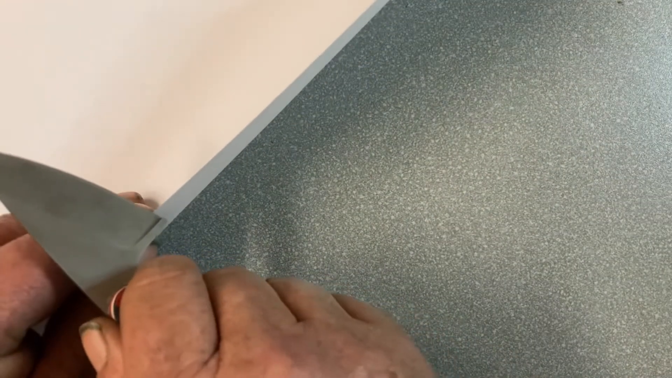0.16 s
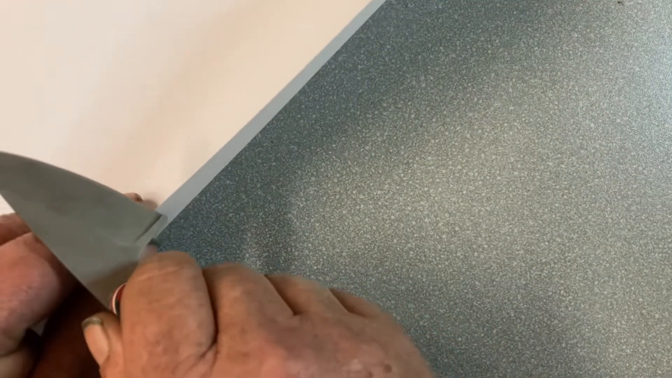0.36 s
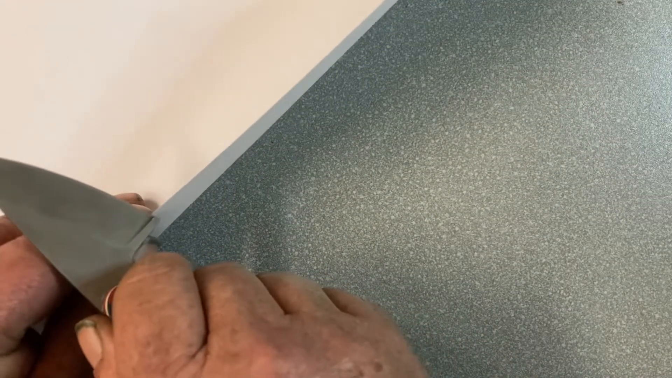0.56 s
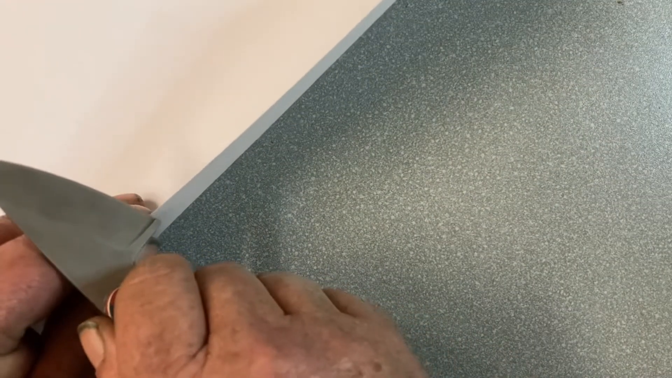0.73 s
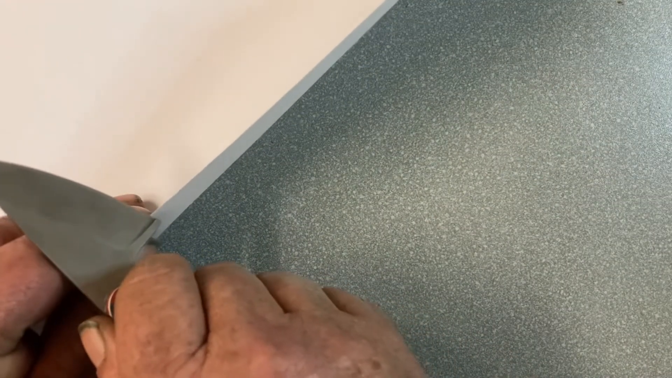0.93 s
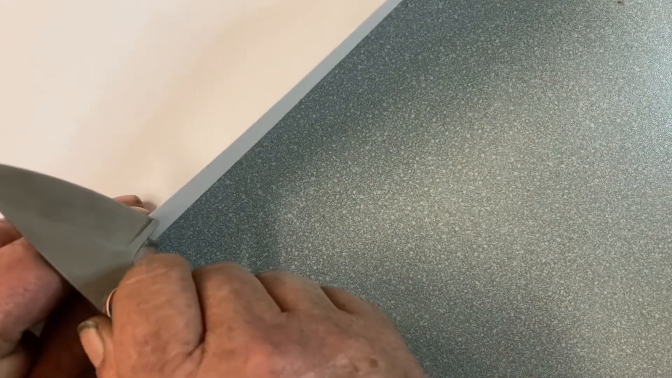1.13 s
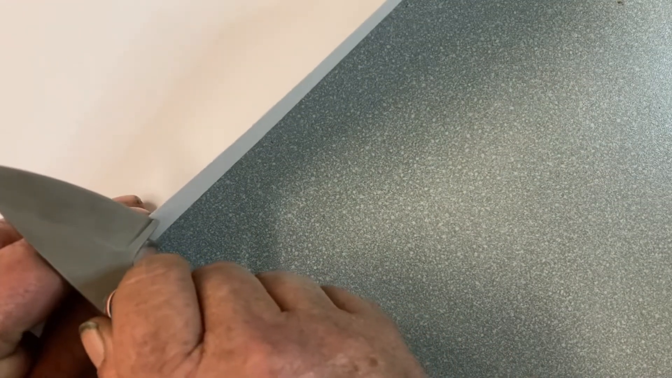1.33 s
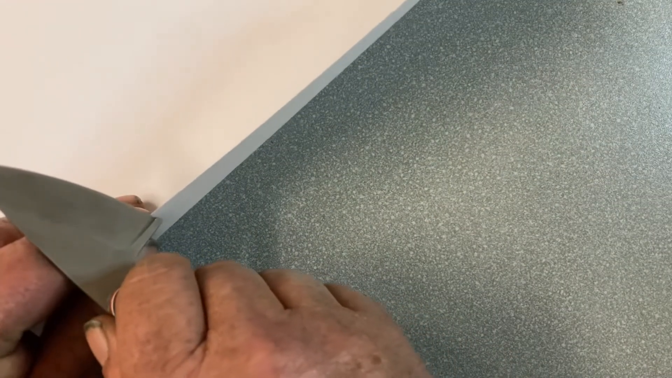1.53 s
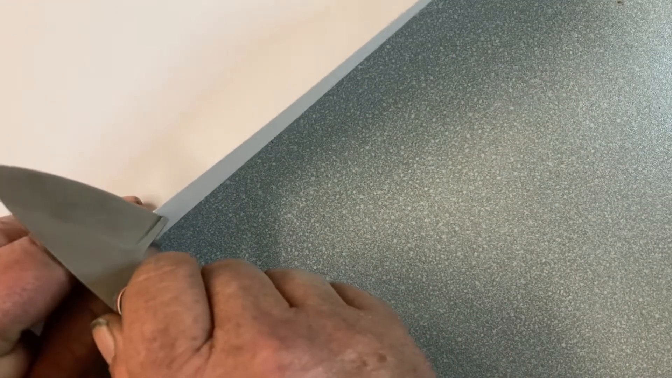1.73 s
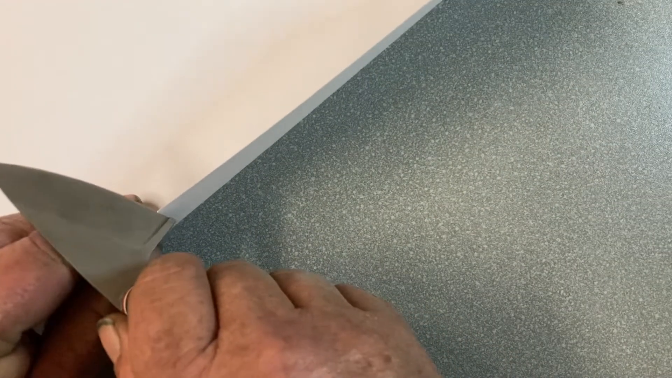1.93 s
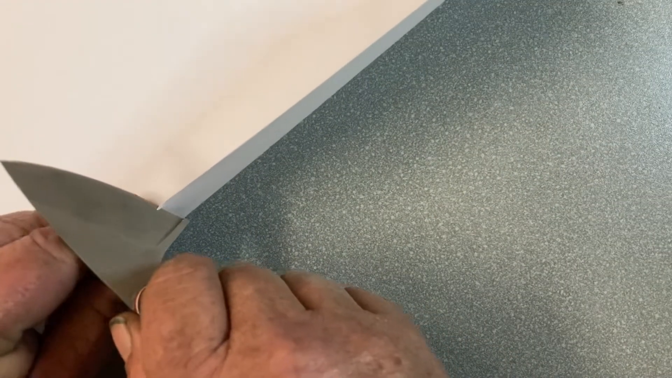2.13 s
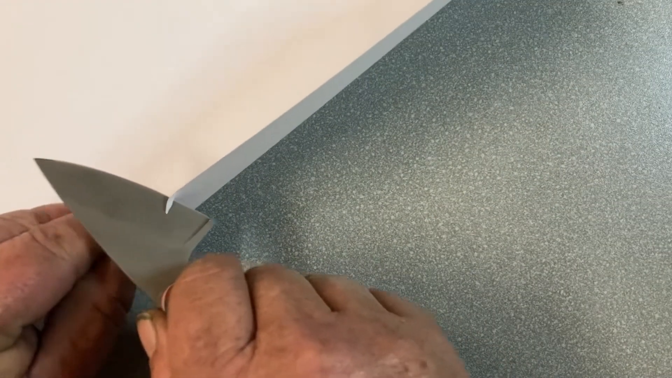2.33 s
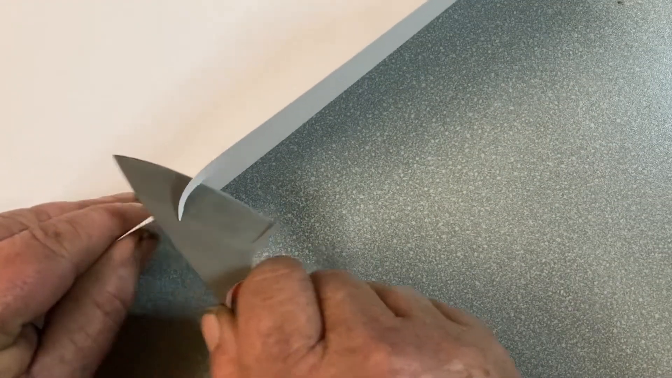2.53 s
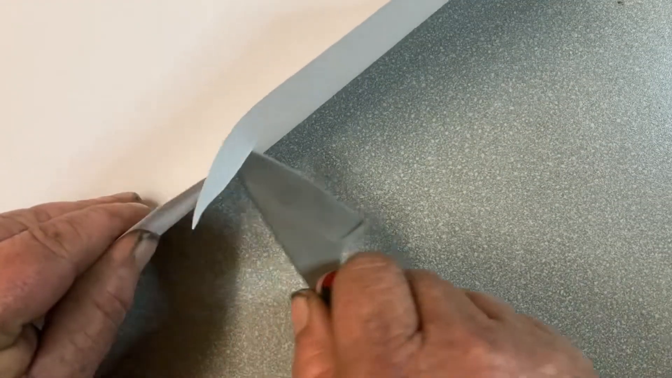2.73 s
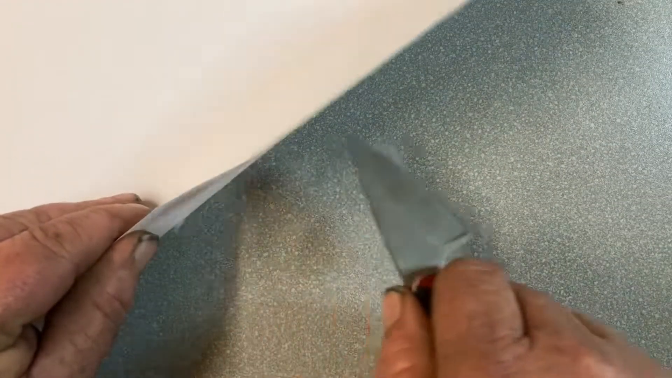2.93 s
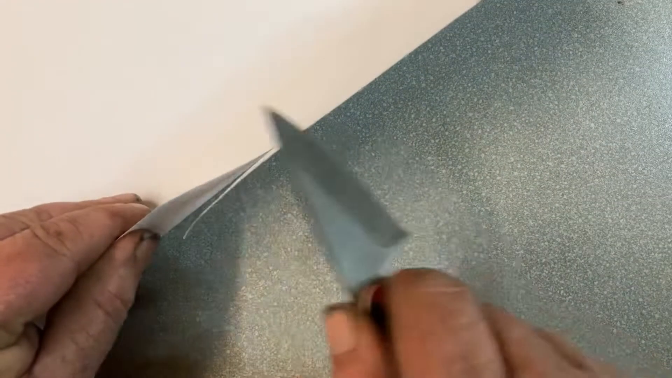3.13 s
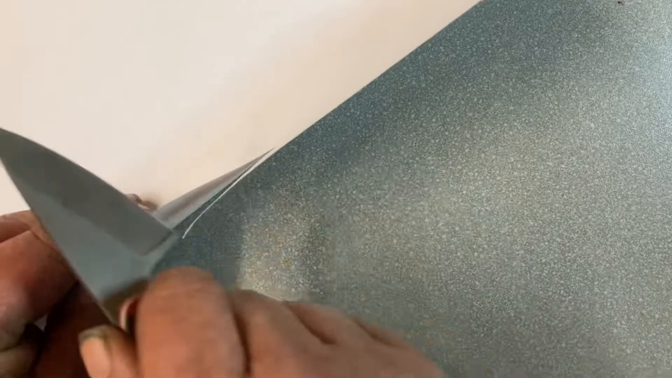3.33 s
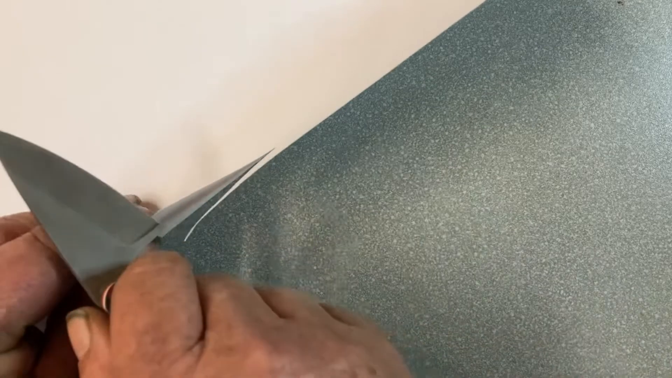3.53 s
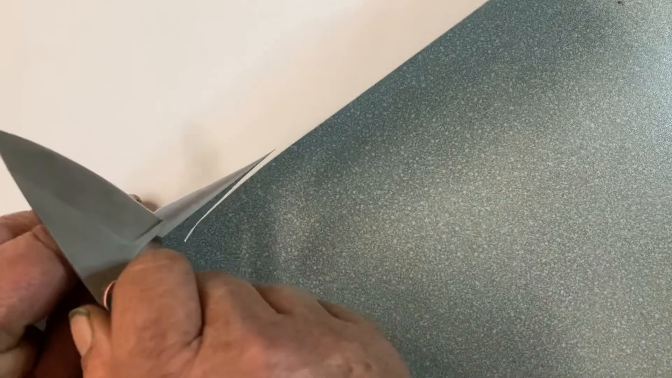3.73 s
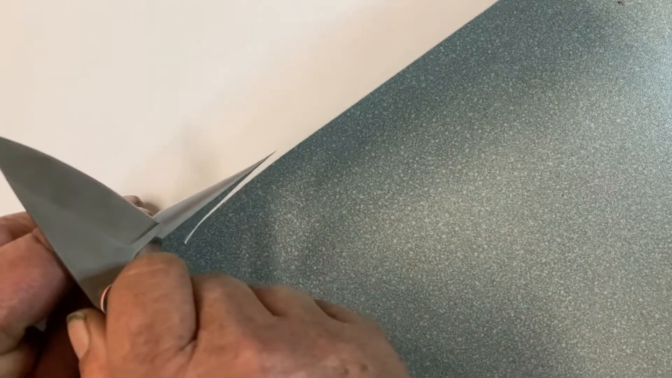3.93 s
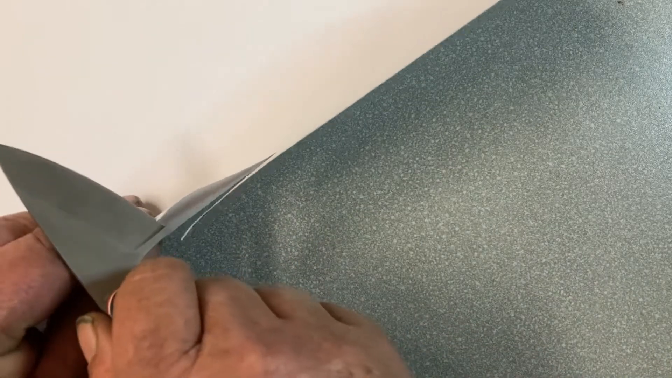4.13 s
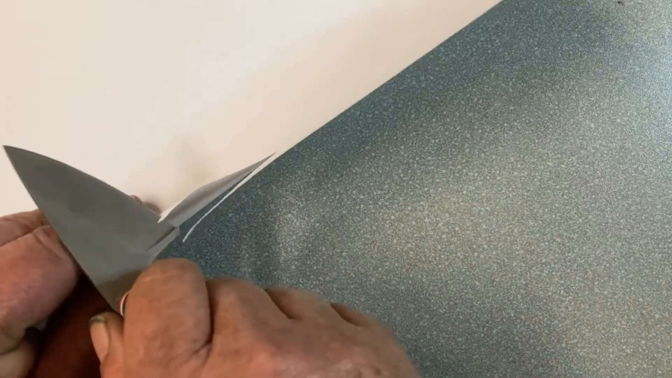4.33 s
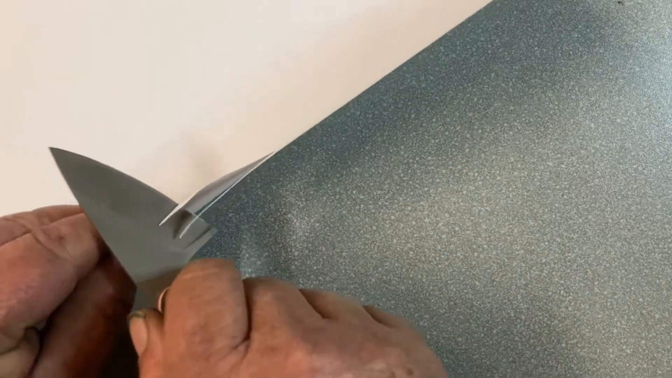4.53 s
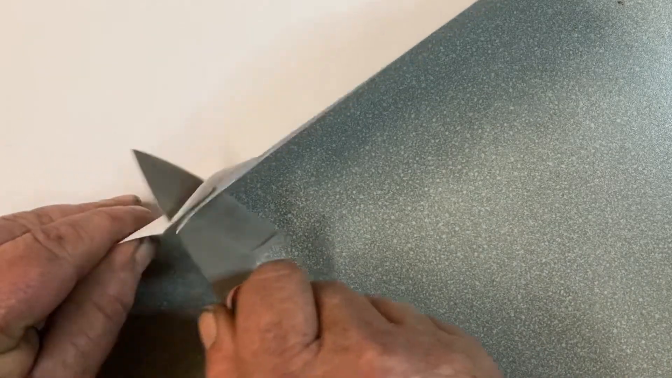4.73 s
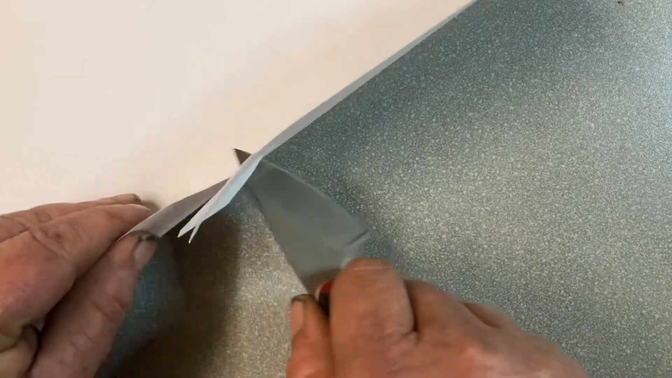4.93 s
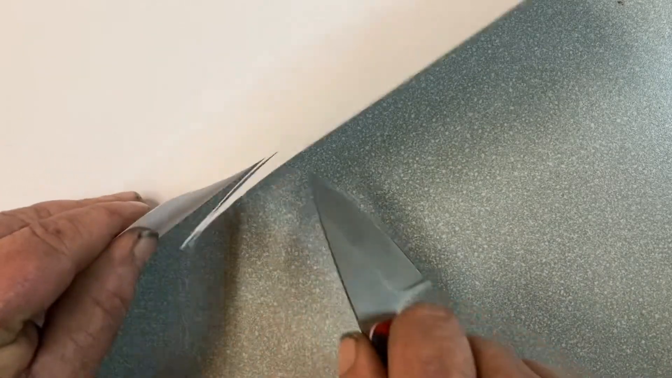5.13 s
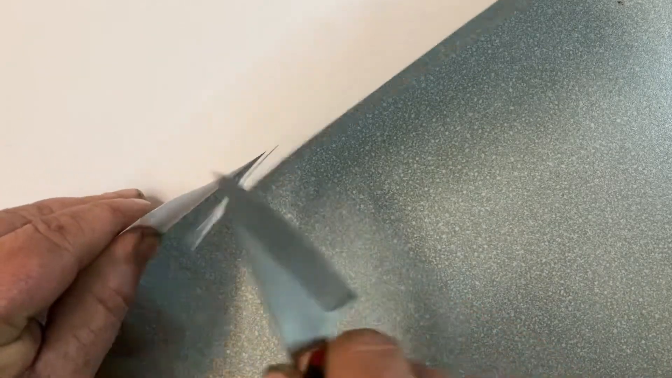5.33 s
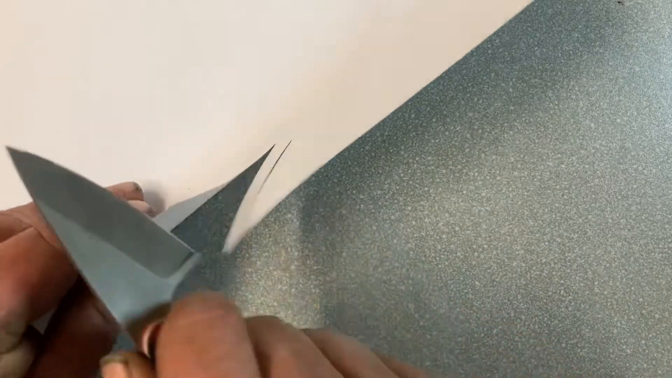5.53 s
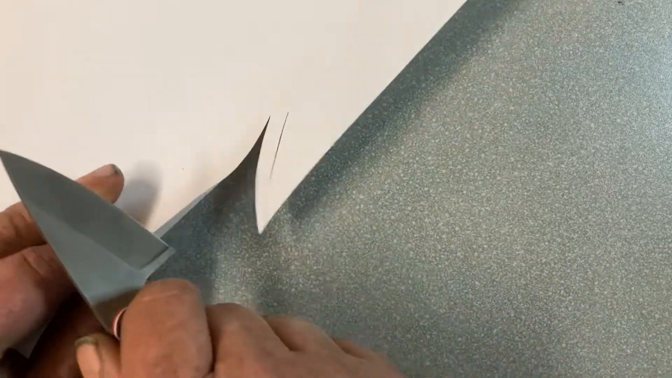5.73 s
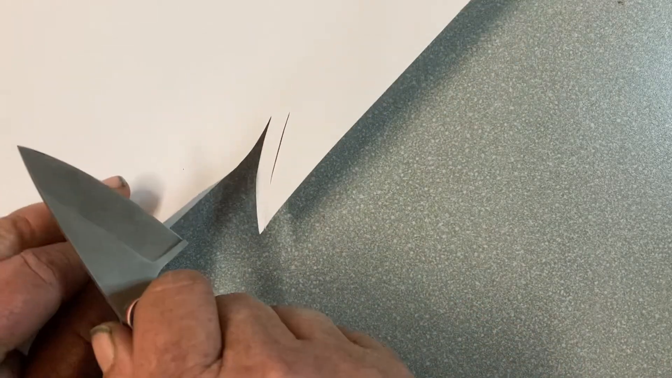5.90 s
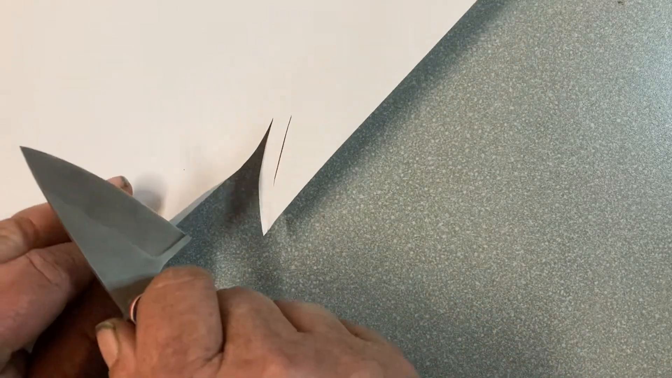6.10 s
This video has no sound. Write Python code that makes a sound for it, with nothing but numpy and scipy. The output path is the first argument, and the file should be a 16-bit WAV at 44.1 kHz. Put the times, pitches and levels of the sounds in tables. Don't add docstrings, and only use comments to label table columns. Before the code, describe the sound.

Close stereo microphones in a small room catch a small knife working on a hand-held sheet of paper. Faint dry scuffs and a small snap lead into a slice that swells to a bright rip and crack. After a quiet gap, the steel edge ticks and stutters, then a second, steadier tearing hiss follows. The sheet pops and rustles as it is turned, over a low motor hum and faint throbbing fan.

```python
import sys
import numpy as np
from scipy import signal
from scipy.io import wavfile
from scipy.ndimage import uniform_filter1d

SR = 44100
rng = np.random.default_rng(int(sys.argv[2]) if len(sys.argv) > 2 else 0)


def put_to_file(sound):
    columns = np.atleast_2d(sound).T
    safe = np.clip(columns, -1, 1)
    whole_steps = np.round(safe * 32767)
    wavfile.write(sys.argv[1], SR, whole_steps.astype(np.int16))


def voltage_ratio(decibels):
    exponent = np.asarray(decibels, float) / 20
    return 10 ** exponent


N = 271656

# hz, level_db
BLADE_COLOUR = [(400, -20), (1000, -8), (2000, -10), (3100, -5), (4500, -10), (6300, -9), (8200, 0),
                (10000, -9), (11800, -7), (13500, -13), (15500, -16)]


def evened(x):
    return x / np.sqrt(np.mean(x ** 2) + 1e-20)


def read(points, hz):
    f, value = np.transpose(points)
    return np.interp(np.log(hz + 1), np.log(f + 1), value)


def band(x, lo_hz, hi_hz):
    return signal.sosfilt(signal.butter(3, [lo_hz, hi_hz], "band", fs=SR, output="sos"), x)


def slow_noise(count, smooth):
    once = uniform_filter1d(rng.standard_normal(count), smooth)
    return evened(uniform_filter1d(once, smooth))


def patches(shape, bins, frames):
    field = rng.standard_normal(shape)
    return evened(uniform_filter1d(uniform_filter1d(field, bins, 0), frames, 1))


def shaped(x, points, patchy_db, bins, frames, size):
    hz, _, z = signal.stft(x, SR, nperseg=size, noverlap=size * 3 // 4)
    colour_db = read(points, hz)[:, None]
    z = z * voltage_ratio(colour_db + patchy_db * patches(z.shape[1:], bins, frames))
    return signal.istft(z, SR, nperseg=size, noverlap=size * 3 // 4)[1][:, :x.shape[1]]


def halves(x):
    body, hiss = band(x, 300, 3600), band(x, 3600, 19000)
    return body / band(x, 1000, 3000).std(), hiss / band(x, 6500, 10500).std()


def friction(tables, colour, grain_db, modes_db, flutter_db, body_db, hiss_db):
    count = N // 2 + N // 8
    first = min(round(tables[0][0][0] * SR) - 2000, N - count)
    t = (first + np.arange(count)) / SR
    sizes = voltage_ratio(grain_db * np.minimum(rng.exponential(1, count), 4))
    slip = evened(voltage_ratio(flutter_db * slow_noise(count, 180)))
    clicks = rng.standard_normal((2, count)) * sizes
    body, hiss = halves(shaped(clicks, colour, modes_db, bins=2, frames=30, size=512))
    out = np.zeros((2, N))
    for rows in tables:
        s, level_db, share_db = np.transpose(rows)
        on = np.flatnonzero((t >= s[0]) & (t < s[-1]))
        edge = np.minimum(1, np.minimum(t[on] - s[0], s[-1] - t[on]) / 0.0051)
        body_gain = voltage_ratio(body_db + np.interp(t[on], s, share_db))
        mix = voltage_ratio(hiss_db) * hiss[:, on] + body_gain * body[:, on]
        out[:, first + on] += edge * slip[on] * voltage_ratio(np.interp(t[on], s, level_db)) * mix
    return out


def pushed(curve, body_db, follow):
    s, db = np.transpose(curve)
    ref_db = -40
    return [np.transpose([s, db, body_db + (follow - 1) * (db - ref_db)])]


def strokes(rows, release_s, linger):
    level = np.array([-14.5, 0, 0, -39.5])
    body_follow = 0.59
    curves = []
    for s, rise, hold, db, body_db in rows:
        times = s + np.cumsum([0, rise, hold, release_s + linger * (rise + hold)])
        share_db = body_db + (body_follow - 1) * np.minimum(level, 0) / 2
        curves.append(np.transpose([times, db + level, share_db]))
    return curves


def slices():
    # time_s, level_db
    push_1 = [
        (1.95, -70),
        (2.052, -51.5),
        (2.3, -46),
        (2.49, -38.5),
        (2.706, -35),
        (2.754, -39.5),
        (2.8, -37.5),
        (2.829, -32),
        (2.84, -54),
    ]
    push_2 = [
        (4.25, -44),
        (4.447, -40.5),
        (4.595, -41.5),
        (4.615, -39),
        (4.703, -37),
        (4.76, -37),
        (4.843, -36.5),
        (4.981, -45),
        (5.028, -36),
    ]
    # hz, level_db
    tear_1 = [(400, -20), (800, -6), (1300, -5), (1650, -1), (2150, -9), (2700, -3), (3500, -4), (5000, -5),
              (6500, 0), (8500, -2), (11000, -6), (13000, -10), (15500, -19)]
    tear_2 = [(400, -16), (800, -5), (1300, -4), (1700, -4), (2400, -5), (3500, -5), (5000, -3), (6500, -2),
              (8500, 0), (11000, -6), (13000, -9), (15500, -15)]
    cut_1 = friction(pushed(push_1, body_db=-8, follow=0.97), tear_1, grain_db=2.5, modes_db=4.0,
                     flutter_db=0.8, body_db=2.5, hiss_db=-0.23)
    cut_2 = friction(pushed(push_2, body_db=-5.5, follow=0.45), tear_2, grain_db=3.0, modes_db=3.5,
                     flutter_db=1.14, body_db=-0.85, hiss_db=0.0)
    return cut_1 + cut_2


def scuffs():
    # start_s, rise_s, hold_s, hiss_db, body_db (against the hiss)
    rubs = [(0.444, 0.032, 0.008, -56.5, -7), (0.887, 0.012, 0.057, -57, -9.5),
            (1.444, .045, 0.028, -62, -5), (1.603, 0.026, 0.0048, -50, -4),
            (1.655, 0.011, .045, -61.5, 1.5), (1.751, 0.0033, 0.0025, -61.5, 4),
            (1.808, 0.026, .004, -60, -3), (1.85, 0.033, 0.012, -58.5, 1), (1.913, 0.016, 0.0092, -54.5, 1),
            (3.572, 0.012, .025, -68, -2.5), (3.728, 0.028, 0.0033, -60, -8), (3.79, 0.035, .01, -74.5, -2),
            (3.85, 0.021, 0.018, -69.5, 0.5), (3.922, 0.019, 0.025, -62, -8)]
    # hz, level_db
    colour = [(400, -12), (800, -12), (1300, -10), (1800, -9), (2150, -12), (2600, -4), (3300, -12),
              (4200, -13), (5200, -4), (6500, 0), (8500, -7), (11000, -10), (13000, -15), (15500, -20)]
    return friction(strokes(rubs, release_s=0.052, linger=0.17), colour, grain_db=2.5, modes_db=0.8,
                    flutter_db=1.5, body_db=0.0, hiss_db=-0.3)


def judder():
    # start_s, rise_s, hold_s, hiss_db, body_db (against the hiss)
    stutters = [
        (4.091, 0.014, 0.021, -43.5, -11),
        (4.187, 0.015, 0.032, -44.5, -15.5),
    ]
    return friction(strokes(stutters, release_s=0.11, linger=.1), BLADE_COLOUR, grain_db=4.5, modes_db=3.5,
                    flutter_db=4.0, body_db=0.0, hiss_db=-5.0)


def snaps():
    # time_s, peak_db, body_db (against the peak)
    fibres = [(0.896, -52, -4), (1.4461, -55.5, -3.5), (1.5753, -54, -4), (1.6137, -37.5, -1),
              (1.6323, -42, 4), (1.755, -46, -4), (1.9833, -47.5, 5.5), (2.8264, -19, -5),
              (3.5703, -41.5, -6.5), (3.685, -67.5, 12), (4.112, -31, -10), (5.0207, -22.5, -28),
              (5.358, -40.5, -1), (5.3687, -37.5, 0), (5.5104, -36, 14.5), (5.8047, -54, -7)]
    # time_s, peak_db, t60_s
    catches = [(2.8225, -18.5, 0.0055), (3.612, -43.5, 0.012), (3.8127, -55, .011), (3.8637, -48, 0.023),
               (4.061, -58, .03), (4.074, -53, .03), (4.0975, -32, .023), (4.1034, -35, .02),
               (4.1224, -34, .02), (4.15, -34, 0.01), (4.1987, -28, .01), (4.2054, -30.5, 0.011),
               (4.2259, -25, 0.0062), (4.244, -23.5, 0.0089), (4.566, -25, 0.024), (4.6036, -17.5, 0.018),
               (5.0235, -19, 0.011), (5.2872, -24.5, 0.0087), (5.489, -38, 0.013)]
    rows = [(*row, .024) for row in fibres]
    rows += [(s, db, -21.5, t60) for s, db, t60 in catches]
    noise = rng.standard_normal((2, N))
    body, hiss = halves(shaped(noise, BLADE_COLOUR, 2.3, bins=6, frames=8, size=256))
    t, bright, low = np.arange(4000) / SR, np.zeros(N + 4000), np.zeros(N + 4000)
    for s, db, share_db, t60 in rows:
        at = slice(round(s * SR), round(s * SR) + 4000)
        t60 = max(t60, .003)
        bright[at] += voltage_ratio(db - 7 - 60 * t / t60) * np.minimum(1, t / 0.00067)
        low[at] += voltage_ratio(db + share_db - 10.5 - 60 * t / (1.9 * t60)) * np.minimum(1, t / 0.003)
    return bright[:N] * hiss + low[:N] * body


def flap():
    # start_s, stop_s, mode_hz, width_hz, rms_db
    modes = [(2, 2.5, 1310, 60, -54), (2.55, 2.84, 1635, 72, -46), (1.85, 2.5, 2600, 150, -59.5),
             (2.6, 2.82, 7000, 81, -44), (2.58, 2.8, 4400, 66, -43.5), (2.6, 2.84, 2010, 120, -46.5),
             (4.58, 4.78, 1880, 70, -45.5), (4.75, 5.02, 2000, 66, -50.5), (4.55, 4.8, 1260, 150, -49),
             (4.35, 4.8, 3400, 25, -56.5), (2.55, 2.84, 3500, 1600, -40.5), (1.9, 2.5, 720, 200, -57.5),
             (4.75, 5.02, 6300, 810, -47.5), (4.3, 5.0, 840, 200, -66), (4.25, 4.75, 7500, 390, -49.5),
             (4.72, 5.0, 2790, 390, -45), (5.015, 5.1, 864, 26, -50), (4.8, 4.98, 720, 61, -56)]
    out = np.zeros((2, N))
    for start, stop, hz, width, db in modes:
        at = slice(round(start * SR), round(stop * SR))
        drive = rng.standard_normal((2, at.stop - at.start))
        ring = signal.lfilter(*signal.iirpeak(hz, hz / width, SR), drive)
        out[:, at] += voltage_ratio(db) * evened(ring) * signal.windows.tukey(ring.shape[1], .7)
    return out


def pops():
    # time_s, level_db, pitch_hz, t60_s
    buckles = [
        (3.5702, -52, 2100, .015),
        (5.0228, -28, 2280, .016),
        (5.359, -46, 2600, .012),
        (5.3697, -41, 2000, .012),
        (5.5105, -26.5, 1600, .019),
    ]
    t, out = np.arange(6000) / SR, np.zeros(N)
    for s, db, hz, t60 in buckles:
        cluster = sum(np.sin(2 * np.pi * k * hz * t) for k in (1.005, 0.826, 0.927, 1.2))
        ring = cluster * voltage_ratio(-60 * t / t60)
        slips = rng.standard_normal(900) * (rng.random(900) < .02) / 4 * np.linspace(1, 0, 900)
        slips[0] = 1
        out[round(s * SR):][:6000] += voltage_ratio(db) / 2 * np.convolve(ring, slips)[:6000]
    return out


def rustles():
    # start_s, rise_s, hold_s, hiss_db, body_db (against the hiss)
    slides = [(3.2, .12, 0.092, -73.5, 2), (5.034, 0.0032, .003, -53.5, 2), (5.06, .02, 0.16, -67.5, -2),
              (5.279, 0.0045, 0.0036, -42, -9), (5.3, 0.065, 0.0095, -55, 0.5),
              (5.38, 0.022, 0.065, -63, -8), (5.452, 0.035, 0.012, -47.5, -0.5),
              (5.495, 0.032, .09, -46.5, -6.5), (5.799, 0.0071, .003, -63, 5.5),
              (6.143, 0.0036, 0.0033, -61.5, 2.5)]
    # hz, level_db
    colour = [(400, -11), (800, -5), (1300, -5), (1700, -4), (2400, -4), (3500, -6), (5000, 0), (6500, -1),
              (8500, 0), (11000, -2), (13000, -6), (15500, -10)]
    return friction(strokes(slides, release_s=0.03, linger=1.37), colour, grain_db=3.5, modes_db=4.0,
                    flutter_db=1.1, body_db=-1.0, hiss_db=-0.6)


def room(x):
    # hz, t60_s
    decay = [(500, 0.44), (2000, 0.5), (8000, 0.23), (15000, 0.29)]
    hz, t, z = signal.stft(rng.standard_normal((2, SR // 2)), SR, nperseg=256)
    t60 = np.maximum(read(decay, hz), .05)[:, None]
    tail = signal.istft(z * voltage_ratio(-60 * t / t60), SR, nperseg=256)[1]
    return signal.fftconvolve(x, tail / np.linalg.norm(tail[0]), axes=1)[:, :N]


def motor():
    # pitch_hz, rms_db
    orders = [
        (49.2, -58.5),
        (196.8, -66.5),
        (343.7, -62),
        (491, -75),
    ]
    t, out = np.arange(N) / SR, np.zeros((2, N))
    for hz, db in orders:
        level = np.sqrt(2) * voltage_ratio(db + 1.7 * slow_noise(N, 6000))
        turns = hz * t + rng.random() + np.array([[0], [1 / 4]])
        out += level * np.sin(2 * np.pi * turns)
    return out


def fan():
    # hz, db_per_hz
    colour = [(450, -26), (750, 11.5), (1000, 3), (1140, 15), (1300, -10.5), (1700, -14.5), (2100, -8.5),
              (2500, -19.5), (2900, -20), (3600, -20)]
    t = np.arange(N) / SR
    air = voltage_ratio(-69) * evened(shaped(rng.standard_normal((2, N)), colour, 4.5, bins=10, frames=18, size=1024))
    throb = voltage_ratio(7.5 * np.cos(2 * np.pi * 7.6 * (t - 0.19)))
    return band(air, 270, 2400) + 0.7 * throb * band(air, 1063, 3700)


def rumble():
    # hz, db_per_hz
    colour = [(22, -13.5), (39, -23.5), (47, 3.5), (72, -3.5), (150, -9.5), (320, -10), (370, -22.5),
              (430, -25.5), (700, -34.5), (1500, -47), (3500, -47.5), (7000, -55), (13500, -54.5),
              (15300, -72)]
    noise = rng.standard_normal((2, N))
    return voltage_ratio(-53.5) * evened(shaped(noise, colour, 1.0, bins=30, frames=10, size=4096))


def scene():
    paper = slices() + scuffs() + judder() + snaps() + flap() + pops() + rustles()
    return paper + voltage_ratio(-12) * room(paper) + motor() + fan() + rumble()


def joint_stereo(left, right, hz, under_db, from_hz):
    top_hz, top_under_db, edge_hz = 12400, 20, 15850
    z = np.array([left + right, left - right])[:, :1024]
    power = uniform_filter1d((abs(z) ** 2).reshape(2, 64, 16, -1).sum(2), size=2, axis=2)
    band_hz = hz[:1024:16, None]
    keep = (power > power[::-1] * voltage_ratio(-2 * under_db)) | (band_hz < from_hz)
    loudest = (power * (band_hz > top_hz / 2)).max((0, 1))
    keep &= (power > loudest * voltage_ratio(-2 * top_under_db)) | (band_hz < top_hz)
    mid, side = z * np.repeat(keep, 16, 1) * (hz[:1024, None] < edge_hz)
    return np.pad(np.array([mid + side, mid - side]) / 2, ((0, 0), (0, 1), (0, 0)))


def blade_shade(hz, t):
    # start_s, stop_s, centre_hz, half_width_hz, share (0-1)
    passes = [
        (1.84, 2.35, 4850, 650, .75),
        (2.3, 2.56, 3500, 250, .7),
        (4.28, 4.48, 4400, 1200, .85),
        (4.255, 5.8, 4800, 900, .22),
    ]
    ramp_s, shade = .04, 0
    for start, stop, centre, half_width, share in passes:
        bump = np.exp(-((hz[:, None] - centre) / half_width) ** 4)
        present = np.clip(np.minimum(t - start, stop - t) / ramp_s + .5, 0, 1)
        shade = shade + share * bump * present
    return shade.clip(0, 1)


def low_pass(x):
    return signal.sosfilt(signal.butter(12, 16390, fs=SR, output="sos"), x)


def record(dry):
    # hz, phase_rad
    lead_points = [(0, -.15), (400, -.15), (560, 2.7), (1000, 4.3), (1300, 6.0), (2000, 6.0), (2700, 5.0),
                   (4000, 3.3), (5300, 3.15), (8300, 6.25), (11800, 9.42), (14900, 12.57)]
    # hz, likeness (0-1)
    same_points = [(60, .97), (350, .92), (500, .5), (2200, .5), (3000, .8), (4300, .6), (4750, .62),
                   (5300, .9), (7000, .9), (8500, .97), (10000, .85), (11800, .97), (13400, .7),
                   (15000, .97)]
    # hz, level_db
    tilt_points = [(60, 3.0), (150, 1.5), (380, -1.5), (950, -0.5), (2380, -1.0), (5980, 2), (15000, -1.5)]
    hz, t, (first, other) = signal.stft(dry, SR, nperseg=2048, noverlap=1536)
    same = read(same_points, hz)[:, None]
    same = same + (1 - same) * .9 * blade_shade(hz, t)
    tilt = voltage_ratio(read(tilt_points, hz) / 2)[:, None]
    drift = .35 * patches(first.shape, bins=70, frames=24) * (hz > 520)[:, None]
    lead = np.interp(hz, *np.transpose(lead_points))[:, None] + drift
    right = (same * first + np.sqrt(1 - same ** 2) * other) * np.exp(-1j * lead)
    both = joint_stereo(first * tilt, right / tilt, hz, under_db=8, from_hz=2000)
    ports = signal.istft(both, SR, nperseg=2048, noverlap=1536)[1][:, :N]
    self_hiss = evened(band(rng.standard_normal((2, N)), 4200, 5800))
    ports = ports + voltage_ratio(-95) * self_hiss
    return low_pass(ports)


dry = scene()
out = record(dry)
put_to_file(out)
```